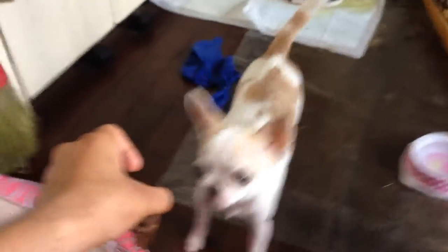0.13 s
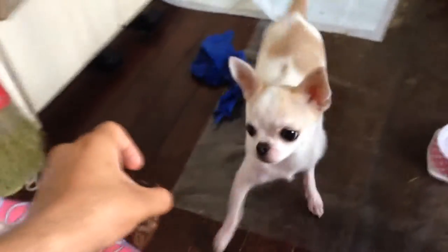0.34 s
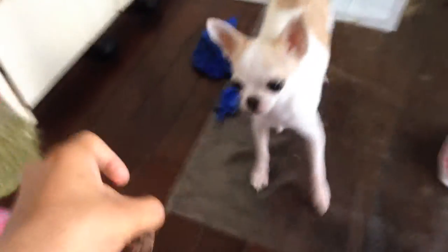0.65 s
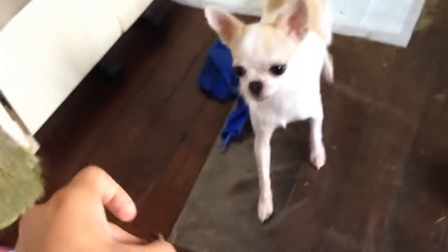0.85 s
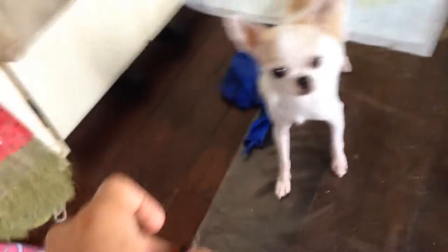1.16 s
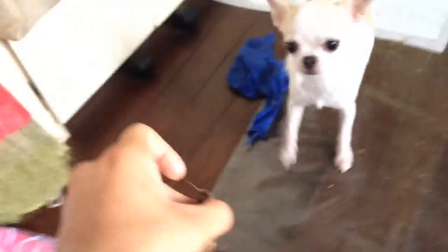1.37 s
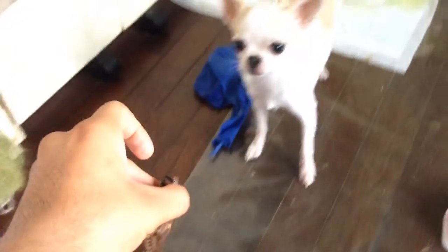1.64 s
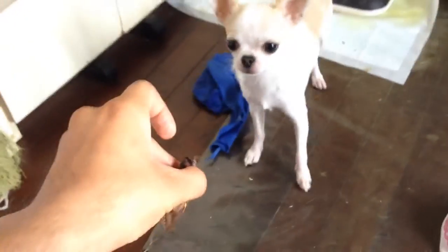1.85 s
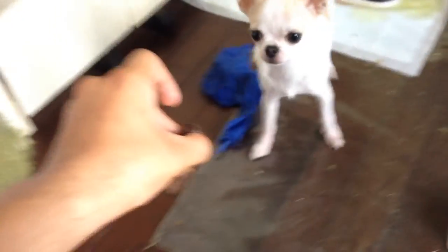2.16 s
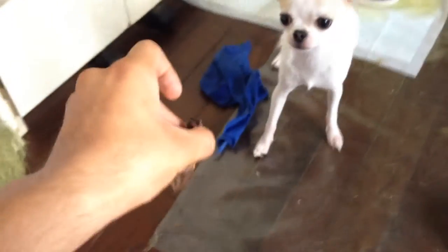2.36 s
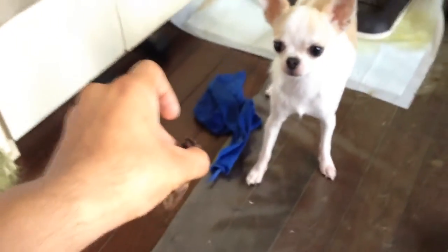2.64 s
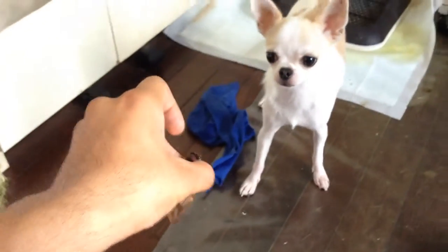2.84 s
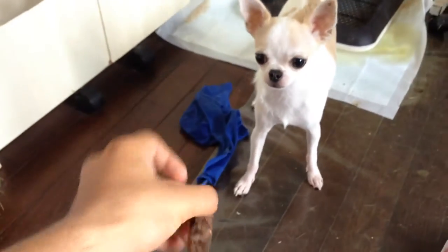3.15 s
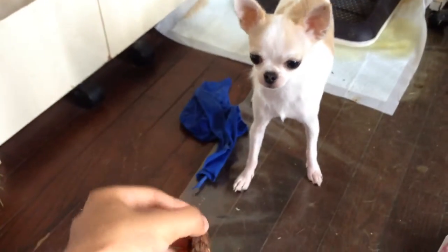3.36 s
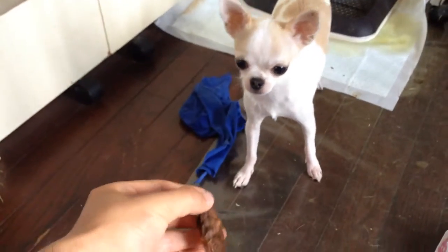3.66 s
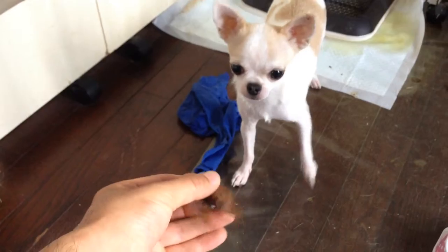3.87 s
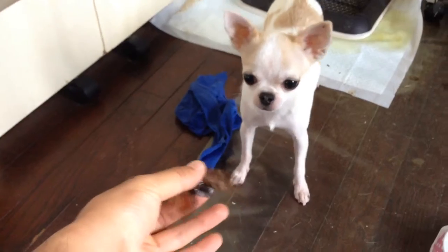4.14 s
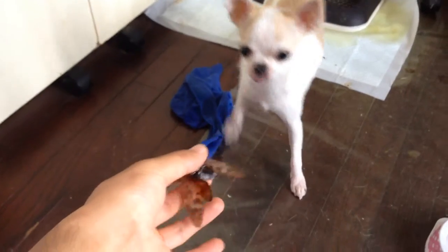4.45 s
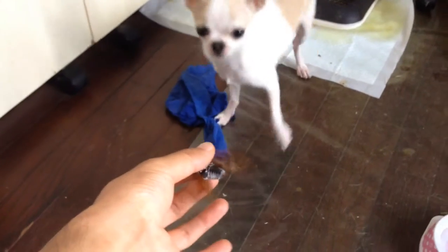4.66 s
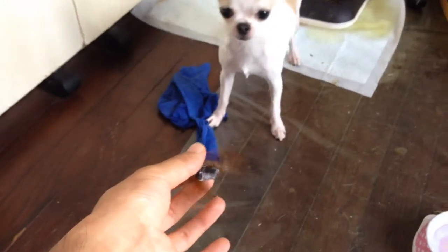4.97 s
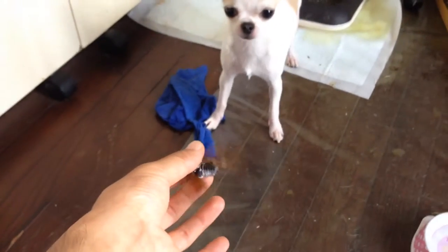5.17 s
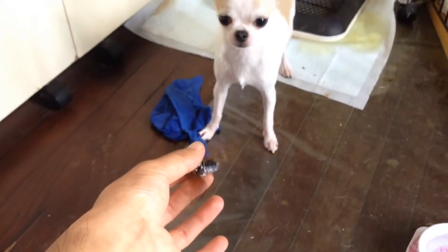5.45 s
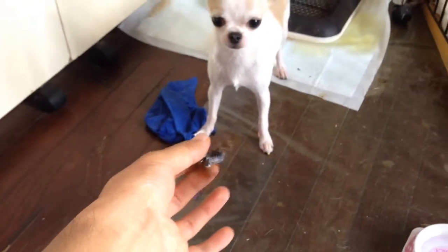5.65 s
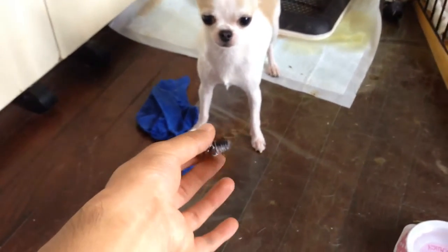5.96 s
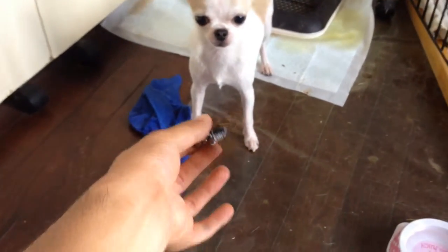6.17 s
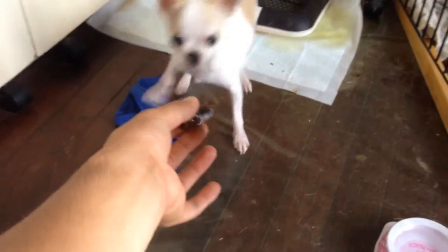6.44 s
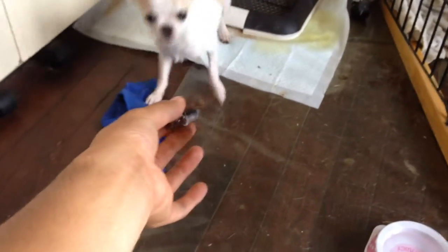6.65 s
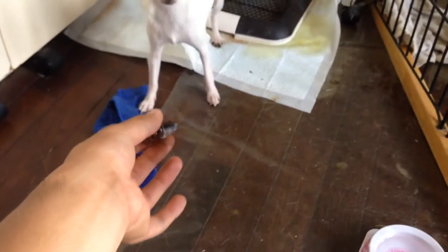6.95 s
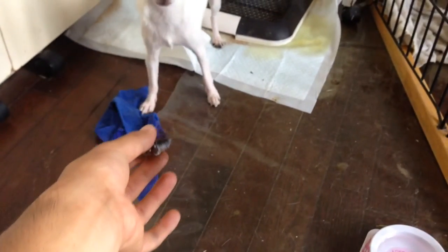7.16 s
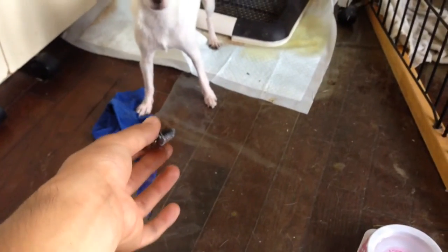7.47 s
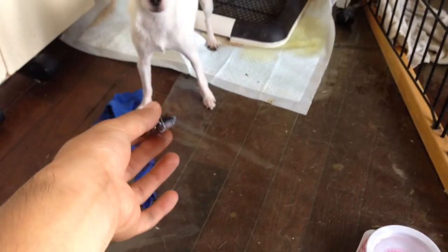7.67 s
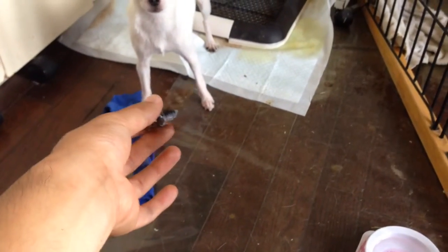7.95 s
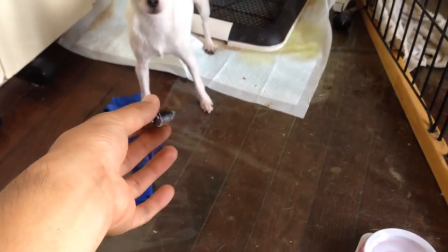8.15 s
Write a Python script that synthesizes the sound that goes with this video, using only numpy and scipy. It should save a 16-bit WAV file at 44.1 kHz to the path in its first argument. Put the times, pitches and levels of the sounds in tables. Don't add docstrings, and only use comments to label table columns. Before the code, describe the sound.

A low room hum with light claw ticks, a brushing slide and a heavier paw landing on wood comes first, dotted by a lone insect click. Then a large cicada close to the microphone crackles, stutters and buzzes loudly, a bright rough rattle with rapidly wobbling pitch and tiny gaps. Soft wing slaps and low air puffs lie beneath; the indoor echo is short and the buzz is cut off at full strength.

```python
import sys
import numpy as np
from scipy import signal
from scipy.fft import rfft, irfft, next_fast_len
from scipy.io import wavfile
from scipy.ndimage import uniform_filter1d, minimum_filter1d

SR = 44100
rng = np.random.default_rng(int(sys.argv[2]) if len(sys.argv) > 2 else 0)


def digitize_waveform(pressure):
    field = np.atleast_2d(pressure).T
    bounded = np.clip(field, -1, 1)
    quanta = np.round(bounded * 32767).astype(np.int16)
    wavfile.write(sys.argv[1], SR, quanta)


def invert_db(x):
    u = np.asarray(x, float) / 20
    return 10 ** u


N = 366471
TIME = np.arange(N) / SR

# f/Hz, density/dB per Hz
HUM_COLOUR = [(15, -42), (25, -16), (100, -2), (150, -10.5), (210, -10), (275, -13), (470, -14), (700, -19),
              (1070, -21.5), (1430, -18), (3540, -19.5), (8000, -26), (14500, -28.5), (15500, -44)]
# t/s, level/dB
HUM_LEVEL = [(0, -62), (.6, -60), (1.2, -61), (2.4, -62), (3.1, -62), (3.6, -65), (3.72, -74), (5.3, -73),
             (8.31, -72)]
# f/Hz, width/Hz, level/dB re the hum
HUM_TONES = [(239.4, 7.4, -14), (345, 7.2, -17)]
# f/Hz, t60/s
ROOM = [(200, 0.26), (2000, 0.17), (5300, 0.15), (14000, 0.15)]
# t/s, rise/s, hold/s, fall/s, level/dB
SLIDES = [
    (0.505, 0.013, 0.092, .03, -59.5),
    (0.636, 0.1, 0.037, 0.13, -39.5),
    (0.772, 0.037, 0.019, 0.077, -41.5),
    (0.861, 0.018, 0.076, 0.094, -59),
    (1.293, 0.039, .065, 0.054, -60.5),
    (1.658, 0.032, 0.065, 0.057, -72),
    (2.066, 0.042, 0.059, .025, -66),
]
# f/Hz, density/dB per Hz
SLIDE_COLOUR = [(120, -50), (200, -15), (231, -13), (371, -15), (500, -5.5), (728, -13), (827, -9.5),
                (1130, -13.5), (4410, -10), (15500, -26.5)]
# t/s, peak level/dB, ring f/Hz, t60/s, hiss level/dB re ring
TAPS = [(0.12, -54, 4190, 0.14, 9), (0.329, -49, 570, 0.14, -12), (0.391, -51, 4710, 0.12, 1),
        (0.432, -52, 584, 0.16, 2), (1.066, -53, 2210, 0.21, 9.5), (1.555, -58, 312, 0.16, 1),
        (1.611, -45, 2020, 0.18, 2), (2.213, -37.5, 566, 0.16, -13.5), (2.4, -55, 579, 0.14, 3),
        (2.748, -29, 2370, 0.089, -6), (2.757, -36, 2660, 0.2, 8.5), (2.983, -41, 3060, 0.35, 3.5),
        (2.995, -43, 3700, 0.34, -6)]
# t/s, peak level/dB, ring f/Hz, t60/s, hiss level/dB
PADS = [
    (0.817, -24, 430, 0.17, -21),
    (1.002, -43, 330, 0.3, -18),
    (1.076, -31.5, 770, 0.17, -12),
    (1.696, -42, 6070, 0.2, -7),
    (3.272, -46, 960, 0.11, -20),
]
# t/s, peak level/dB, ring f/Hz, t60/s, hiss level/dB re ring
OVERTONES = [(.824, -28.5, 295, 0.26, -30), (.835, -39, 203.7, 0.5, -30), (1.612, -48, 1090, .25, -30),
             (2.135, -48, 566, 0.14, -30), (2.215, -43, 1250, 0.32, -30), (2.758, -46, 5250, 0.56, -30),
             (2.76, -43, 9000, .25, -30), (2.762, -46, 10500, .2, -30), (2.99, -39.5, 5500, 0.35, -30)]
# f/Hz, density/dB per Hz
SCRAPE_COLOUR = [(800, -26), (1700, -7), (1950, -30), (2500, 7), (2700, -4), (5340, -9), (10500, -20),
                 (13000, -33)]
# t/s, peak level/dB, f/Hz
THUMPS = [(0.091, -59, 201), (0.2, -55, 110), (0.659, -64, 91.5), (0.744, -49, 107), (0.804, -41, 116),
          (0.912, -45, 87), (0.975, -43, 79.5), (1.113, -46.5, 92), (1.472, -54, 91.5), (2.078, -50, 96.9)]
# t/s, slap level/dB, rate/beats per s, air push level/dB
WINGS = [(3.64, -82, 36.5, -89), (3.93, -67.5, 36, -84), (4.28, -69.5, 31.7, -79), (4.83, -71, 29.5, -74),
         (5.2, -70, 30, -79), (5.4, -71, 29.3, -69), (6.01, -65, 29.6, -64.5), (7.22, -68, 39.3, -67.5),
         (7.4, -65.5, 36, -65), (8.31, -67, 36.4, -64)]
# t/s, lead-in/s, slap change/dB, push change/dB
FALTERS = [
    (3.99, 0.037, 6.5, 17),
    (4.49, 0.066, -4, -10),
    (4.92, 0.11, 3, -11),
    (5.12, 0.17, -5.5, 2),
    (5.39, 0.082, 6, -5),
    (5.82, 0.1, -16, -15),
    (7.33, 0.11, -9, -2),
    (7.9, 0.064, -12, -11),
]
# f/Hz, density/dB per Hz
SLAP_COLOUR = [(220, -18), (340, -2), (620, -1), (1050, -1), (1450, 1), (1950, -3), (2700, -30)]
# f/Hz, density/dB per Hz
PUSH_COLOUR = [(25, -23), (60, -0.5), (120, 0), (220, 0), (330, -17)]
# t/s, peak level/dB, main mode f/Hz
CLICKS = [(0.2236, -11, 4860), (.2262, -24, 5400), (0.226, -35, 5400), (3.1103, -7, 4900),
          (3.1284, -8, 4900), (3.1318, -5, 5000), (3.134, -7.5, 5240), (3.1398, -8, 5200),
          (3.1557, -8, 4870), (3.1595, -6, 5060), (3.1638, -6, 4900), (3.167, -8.5, 4750),
          (3.1688, -22, 4950), (3.175, -17, 5300), (3.4796, -5.5, 5400), (3.482, -18, 5210),
          (3.488, -8.5, 5300), (3.4905, -22, 5300)]
# t/s, rate/buckles per s
BUCKLES_PER_S = [(3.2, 385), (3.55, 378), (3.8, 369), (4.0, 360), (4.46, 347), (4.49, 359), (4.75, 347),
                 (5.09, 333), (5.15, 353), (5.35, 341), (5.75, 330), (5.9, 351), (6.15, 333), (6.5, 348),
                 (7.15, 341), (7.6, 334), (7.93, 334), (8.31, 352)]
# start t/s, end t/s, opening overshoot f/Hz, time to reach it/s, closing level change/dB
PHRASES = [
    (3.217, 3.375, 1400, 0.058, 2),
    (3.402, 3.421, 0, 0.022, -6),
    (3.526, 4.465, 1200, 0.05, -4),
    (4.475, 5.09, 1502, 0.056, -8),
    (5.132, 5.747, 1700, 0.042, -0.5),
    (5.758, 5.848, 852, 0.035, -2.5),
    (5.874, 7.932, 1100, 0.032, 1.5),
    (7.945, 8.311, 900, 0.024, 0),
]
# t/s, level/dB, main mode f/Hz
POSTURE = [(3.216, -25.5, 5300), (3.29, -20, 5180), (3.375, -25, 5700), (3.41, -18, 5570),
           (3.53, -24, 5300), (3.611, -17.5, 5320), (3.64, -22, 7060), (3.725, -22.5, 7730),
           (3.966, -21, 7070), (4.07, -23.5, 7380), (4.3, -23, 7240), (4.55, -22.5, 6980),
           (5.16, -23.5, 7060), (5.19, -28.5, 7100), (5.45, -23.5, 7000), (6.1, -24.5, 7040),
           (6.6, -23, 7220), (8.31, -23.5, 6980)]
# slackest t/s, dip f/Hz, snap/s, overshoot f/Hz
JERKS = [(4.171, 100, 0.023, 450), (4.206, 550, 0.089, 150), (4.315, 300, 0.0086, 450),
         (4.355, 650, 0.04, 254), (4.411, 700, 0.067, 0), (4.645, 50, 0.03, 500), (4.789, 450, 0.016, 302),
         (4.95, 550, 0.054, 102), (5.041, 898, 0.075, -4), (5.33, 0, 0.051, 502), (5.558, 300, 0.025, 400),
         (5.629, 700, 0.061, 896), (5.822, 997, 0.034, 0), (6.095, 947, 0.02, 652),
         (6.182, 1196, 0.021, 600), (6.427, 750, 0.017, 450), (6.566, 996, 0.023, 450),
         (6.87, 250, 0.019, 150), (7.065, 552, 0.034, 900), (7.17, 200, 0.038, 650), (7.27, 647, 0.065, 2),
         (7.326, 1052, 0.049, 1002), (7.41, 398, 0.081, 0), (7.56, 93, 0.043, 750), (7.64, 700, 0.071, 600),
         (7.775, 450, 0.046, 0), (7.822, 902, 0.027, 550), (8.17, 100, 0.012, 400),
         (8.214, 100, 0.048, 800)]
# t/s, half length/s, tension change f/Hz
SHIVERS = [(3.677, 0.014, -780), (3.742, 0.06, 390), (3.817, 0.03, -510), (3.868, 0.01, -700),
           (3.925, 0.0076, -510), (3.997, 0.013, 440), (4.082, 0.026, 310), (4.103, 0.0072, -490),
           (4.218, 0.0099, 690), (4.305, 0.018, 500), (4.315, 0.01, -450), (4.389, 0.0099, 610),
           (4.51, 0.01, -620), (4.548, 0.011, -520), (4.575, 0.014, 480), (4.78, 0.019, -650),
           (4.858, 0.043, 575), (5.025, 0.016, -590), (5.186, 0.018, -980), (5.237, 0.021, -350),
           (5.345, 0.019, 490), (5.48, 0.06, 350), (5.616, 0.0077, 670), (5.712, 0.012, -790),
           (5.907, 0.04, 260), (5.937, 0.023, 750), (6.031, 0.0085, -560), (6.074, 0.021, 870),
           (6.148, 0.013, 610), (6.203, 0.018, -360), (6.232, 0.033, 560), (6.298, 0.013, -570),
           (6.4, 0.024, 408), (6.484, 0.0085, -560), (6.548, 0.012, -480), (6.708, 0.018, 390),
           (6.765, 0.024, 550), (6.857, 0.022, -640), (6.933, 0.015, -610), (6.996, 0.013, 510),
           (7.02, 0.022, -450), (7.106, 0.0096, 600), (7.128, 0.043, -580), (7.156, 0.0086, -610),
           (7.233, 0.0076, -500), (7.25, 0.058, -740), (7.321, 0.038, -220), (7.405, 0.0085, -770),
           (7.42, 0.017, 480), (7.454, 0.018, -510), (7.544, 0.032, -460), (7.623, 0.027, -580),
           (7.714, 0.012, -470), (7.748, 0.012, 440), (7.823, 0.036, -560), (7.876, 0.02, 500),
           (7.917, 0.022, -800), (7.985, 0.01, 520), (8.037, 0.018, 400), (8.13, 0.012, -550)]
# tension over belly stretch f/Hz, level/dB, upper modes level/dB re main
TIGHTNESS = [(5700, 1.5, -13), (6170, 0.5, -11.5), (6380, 1.5, -9), (7000, 1, -3.5), (7470, 0.5, 1),
             (9100, -5.5, 12)]
# t/s, factor on the belly modes
STRETCH = [(3.2, .85), (3.55, .89), (3.74, .97), (4.3, 1.0), (8.31, 1.0)]
# t/s, share 0-1
BELLY_TAUT = [(3.5, 0.63), (3.7, 0.81), (4.1, 0.96), (4.7, 1), (8.31, 0.92)]
# belly part f/Hz, share of the tension, level/dB, ring/ms,
# pitch scatter/share, upward glide at the start/share. First the drum's lower modes:
LOWER = [(0, 0.97, 9.5, 0.67, 0.028, 0.065), (2770, 0.417, -5.5, 1.3, 0.057, 0.008),
         (4900, 0.043, -3, 2.3, 0.019, 0.0046)]
UPPER = [(0, 1.988, 2, 1, 0.013, 0.11), (0, 1.81, -11.5, 1, 0.08, 0.27),
         (0, 1.69, -14.5, 0.26, 0.031, 0.072)]
SLACK_BELLY = [(5300, 0, 0, 0.99, 0.034, .01)]
SNAP = [(5500, 1.164, 1.5, 0.16, 0.043, .01), (9700, 1.0, -5, 0.2, 0.039, .01),
        (10100, 0.097, -11, 0.11, 0.08, .01)]
SAC = [(2121, 0.086, 4, 2.9, 0.017, 0.0059), (2284, 0.013, -9, 1.6, 0.063, 0.0061),
       (3430, 0, 6.5, 0.32, 0.059, 0.011), (4100, 0, -6, 0.45, 0.061, 0.0088)]

SAG_HZ_PER_S, SETTLE_S = 29400, 0.015
OPEN_SLACK_HZ, CLOSE_SLACK_HZ, CLOSE_S = 443, 960, 0.031
OPEN_HOLD = 0.17
JITTER_S, DRUM_LAG_S = 0.00002, 0.00022
POP_BACK_S, POP_SCATTER_S = 0.0013, 0.00008
PHASE_SCATTER = 0.08
BELLY_SWAY = 0.014
RESTART_SLACK, RESTART_S = 0.11, 0.052


def evened(x):
    return x / np.sqrt(np.mean(x ** 2) + 1e-20)


def curve(rows, t):
    s, *columns = np.transpose(rows)
    return [np.interp(t, s, c) for c in columns]


def add(mix, s, sound):
    part = mix[round(s * SR):][:len(sound)]
    part += sound[:len(part)]


def noise(colour, count):
    size = next_fast_len(count)
    f, db = np.transpose(colour)
    log_hz = np.log(np.fft.rfftfreq(size, 1 / SR) + 1)
    shape = invert_db(np.interp(log_hz, np.log(f + 1), db))
    return evened(irfft(rfft(rng.standard_normal(size)) * shape, size)[:count])


def drift(count, first, second):
    smooth = uniform_filter1d(rng.standard_normal(count), size=first)
    return evened(uniform_filter1d(smooth, size=second))


def above(x, hz, order):
    return signal.sosfilt(signal.cheby1(order, 1, hz, "high", fs=SR, output="sos"), x)


def hum():
    waver_db = 1.1 * evened(uniform_filter1d(rng.standard_normal(N), 3000))
    tones = 0
    for hz, width, db in HUM_TONES:
        tones = tones + invert_db(db) * noise([(hz - 2 * width, -50), (hz, 0), (hz + 2 * width, -50)], N)
    running = np.clip((2.46 - TIME) / 0.15 + 1, 0, 1)
    level_db = curve(HUM_LEVEL, TIME)[0] + waver_db
    return invert_db(level_db) * (noise(HUM_COLOUR, N) + tones * running)


def room(x):
    f, t60 = np.transpose(ROOM)
    at, out = np.arange(100, SR // 2 - 20, 20), 0
    for k in range(3):
        echoes = np.zeros(SR // 2)
        echoes[at + rng.integers(0, 20, len(at))] = rng.choice([-1., 1.], len(at))
        hz, t, z = signal.stft(echoes, SR, nperseg=128)
        decay = invert_db(-60 * t / np.interp(hz, f, t60)[:, None])
        tail = signal.istft(z * decay, SR, nperseg=128)[1]
        share = np.sqrt(2 / 3) * np.cos(2 * np.pi * (1.7 * TIME + k / 3))
        out = out + signal.fftconvolve(share * x, tail / np.linalg.norm(tail))[:N]
    return out


def thumps():
    out, t = np.zeros(N), np.arange(SR // 3) / SR
    for s, db, hz in THUMPS:
        swell = (t / 0.015) * np.exp(1 - t / 0.01)
        add(out, s, invert_db(db) * swell * np.sin(2 * np.pi * hz * t))
    return out


def slides():
    out = np.zeros(N)
    for s, rise, hold, fall, db in SLIDES:
        t = np.arange(0, rise + hold + fall, 1 / SR)
        press = np.clip(np.minimum(t / rise, (t[-1] - t) / fall), 0, 1)
        level = invert_db(db - 20 * (1 - press))
        add(out, s, level * noise(SLIDE_COLOUR, len(t)) * signal.windows.tukey(len(t), .1))
    return out


def taps():
    out, t = np.zeros(N), np.arange(SR // 3) / SR
    for rows, width in (TAPS, 0.21), (PADS, 0.89), (OVERTONES, 0.19):
        for s, db, hz, t60, hiss_db in rows:
            ring_colour = [(hz * (1 - width) ** 3, -40), (hz * (1 - width / 2), -3), (hz, 0),
                           (hz * (1 + width / 2), -3), (hz * (1 + width) ** 3, -40)]
            burst = noise(ring_colour, len(t)) + invert_db(hiss_db) * noise(SCRAPE_COLOUR, len(t))
            attack = np.minimum(t / 0.00051, 1)
            add(out, s, invert_db(db - 12.5 - 60 * t / t60) * attack * burst)
    return out


def wings():
    slap_db, per_s, push_db = curve(WINGS, TIME)
    for s, lead, slap_change_db, push_change_db in FALTERS:
        share = np.interp(TIME - s, [-lead, 0, 0.11], [0, 1, 0])
        slap_db, push_db = slap_db + slap_change_db * share, push_db + push_change_db * share
    turns = np.cumsum(per_s) / SR
    strength = invert_db(2.8 * rng.standard_normal(400))[turns.astype(int)]
    beat = strength * np.exp(-(turns % 1) / 0.12)
    slap = evened((0.37 + beat) * noise(SLAP_COLOUR, N))
    push = evened((0.54 + uniform_filter1d(beat, 300)) * noise(PUSH_COLOUR, N))
    fade_in = np.clip((TIME - WINGS[0][0]) / 0.062, 0, 1)
    return (invert_db(slap_db + 3.5) * slap + invert_db(push_db + 4.5) * push) * fade_in


def rings(s, level_db, tension_hz, modes, sway, count):
    t, grains = np.arange(count) / SR, 0
    stretch = curve(STRETCH, s)[0] * sway
    chance = np.clip(rng.standard_normal((len(s), len(modes), 2)), -2, 2)
    stray = PHASE_SCATTER * rng.standard_normal((len(s), len(modes), 1))
    phase = np.arange(len(modes))[:, None] / 2 + stray
    for k, (belly_hz, share, db, ms, scatter, glide) in enumerate(modes):
        hz = (belly_hz * stretch + share * tension_hz) * (1 + scatter * chance[:, k, 0])
        late = np.maximum(t - k * 0.000118, 0)
        shape = (1 - np.exp(-late / 0.0001)) ** 2 * np.exp(-late * 1000 / ms) / np.sqrt(ms)
        bent = late - glide * 0.00032 * (1 - np.exp(-late / 0.00049))
        ring = np.sin(2 * np.pi * (hz[:, None] * bent + phase[:, k]))
        grains = grains + invert_db(db + 1.95 * chance[:, k, 1:]) * shape * ring
    energy = np.mean(np.sum(grains ** 2, axis=1))
    grains *= invert_db(level_db)[:, None] / np.sqrt(energy)
    at = np.round(s * SR).astype(int)[:, None] + np.arange(count)
    return np.bincount(at.ravel(), grains.ravel(), N + count)[:N]


def phrase(s, start, end, overshoot_hz, rise, close_db):
    effort_db, hz = curve(POSTURE, s)
    closing = np.clip(1 - (end - s) / CLOSE_S, 0, 1) * (end < TIME[-1] - CLOSE_S)
    slack_hz = np.clip(hz[0] - 5000, 0, OPEN_SLACK_HZ)
    opening = [OPEN_HOLD * rise, rise, rise + SETTLE_S]
    hz = hz + np.interp(s - start, opening, [-slack_hz, overshoot_hz, 0])
    hz = hz - closing * np.clip(hz - 5900, 0, CLOSE_SLACK_HZ)
    for at, dip_hz, snap, over_hz in JERKS:
        moments = [-dip_hz / SAG_HZ_PER_S - .005, 0, snap, snap + SETTLE_S]
        hz = hz + np.interp(s - at, moments, [0, -dip_hz, over_hz, 0])
    for at, half, change_hz in SHIVERS:
        hz = hz + change_hz * np.clip(1 - abs(s - at) / half, 0, 1)
    level_db, upper_db = curve(TIGHTNESS, hz / curve(STRETCH, s)[0])
    return s, effort_db + level_db + close_db * closing, hz, upper_db


def buckle_times():
    wander = 1 + .007 * drift(N, 1500, 1200)
    turns = np.cumsum(curve(BUCKLES_PER_S, TIME)[0] * wander) / SR
    beats = TIME[1:][np.diff(np.floor(turns)) > 0]
    second_drum = np.arange(len(beats)) % 2
    return beats + JITTER_S * rng.standard_normal(len(beats)) + DRUM_LAG_S * second_drum


def buckles():
    beats, buzzes = buckle_times(), []
    for row in PHRASES:
        inside = beats[(beats > row[0] + .002) & (beats < row[1])]
        buzzes.append(np.vstack(phrase(np.r_[row[0], inside], *row)))
    s, effort_db, tension_hz, upper_db = np.hstack(buzzes)
    tremble = drift(len(s), 5, 4)
    tension_hz, upper_db = tension_hz * (1 + .008 * tremble), upper_db + 1.2 * tremble
    side = (-1) ** np.arange(len(s)) * curve(BELLY_TAUT, s)[0]
    single_s, peak_db, single_hz = np.transpose(CLICKS)
    s, tension_hz = np.r_[s, single_s], np.r_[tension_hz, single_hz]
    lower_db = np.r_[effort_db + 20.5 + 3.5 * side, peak_db + 7.0]
    upper_db = np.r_[effort_db + upper_db + 20.5 - 3.0 * side, peak_db - 8.0]
    back_s = s + POP_BACK_S + POP_SCATTER_S * rng.standard_normal(len(s))
    s, tension_hz = np.r_[s, back_s], np.r_[tension_hz, .96 * tension_hz]
    return s, np.r_[lower_db, lower_db - 7.0], np.r_[upper_db, upper_db - 9.0], tension_hz


def belly(drums):
    loose = 0
    for row in PHRASES:
        loose = loose + np.interp(TIME - row[0], [-.01, 0, RESTART_S, RESTART_S + 0.017], [0, 1, 1, 0])
    stretched = np.clip(curve(BELLY_TAUT, TIME)[0] - RESTART_SLACK * loose, 0, 1)
    slack = above(drums, 4610, order=4)
    taut = signal.sosfiltfilt(signal.cheby1(4, 1, 5194, "high", fs=SR, output="sos"), slack)
    return slack + stretched * (taut - slack)


def cicada():
    s, lower_db, upper_db, tension_hz = buckles()
    breath = noise([(1, -20), (4, 0), (20, -3), (40, -40)], N)
    sway = 1 + BELLY_SWAY * np.interp(s, TIME, breath)
    slackness_db = 20 * np.log10(np.clip(1 - curve(BELLY_TAUT, s)[0], .01, 1))
    drums = rings(s, lower_db, tension_hz, LOWER, sway, count=260)
    drums = drums + rings(s, upper_db, tension_hz, UPPER, sway, count=160)
    drums = drums + rings(s, lower_db + slackness_db + 3.5, tension_hz, SLACK_BELLY, sway, count=200)
    drums = drums + rings(s, (lower_db + upper_db) / 2 - 2.5, tension_hz, SNAP, sway, count=80)
    sac_db = lower_db - 23.0 - 1.6 * invert_db(slackness_db)
    sac = above(rings(s, sac_db, tension_hz, SAC, sway, count=450), 1800, order=3)
    return belly(drums) + signal.lfilter(*signal.iirnotch(3030, 12.0, fs=SR), sac)


def scene():
    insect = cicada()
    dog = slides() + taps() + thumps()
    mono = hum() + dog + wings() + insect + invert_db(-3.5) * room(insect)
    return np.array([mono, mono])


def roll_off(x):
    return signal.sosfilt(signal.butter(12, 16120, fs=SR, output="sos"), x)


def record(dry):
    headroom = np.minimum(.66 / (abs(dry) + 1e-9), 1)
    lowest = minimum_filter1d(headroom, size=81)
    held = dry * uniform_filter1d(uniform_filter1d(lowest, size=40), size=40)
    low_pass = signal.firwin(511, 15310, window=("kaiser", 9), fs=SR)
    mix = signal.oaconvolve(held, low_pass[None], "same")
    return roll_off(mix)


dry = scene()
out = record(dry)
digitize_waveform(out)
```